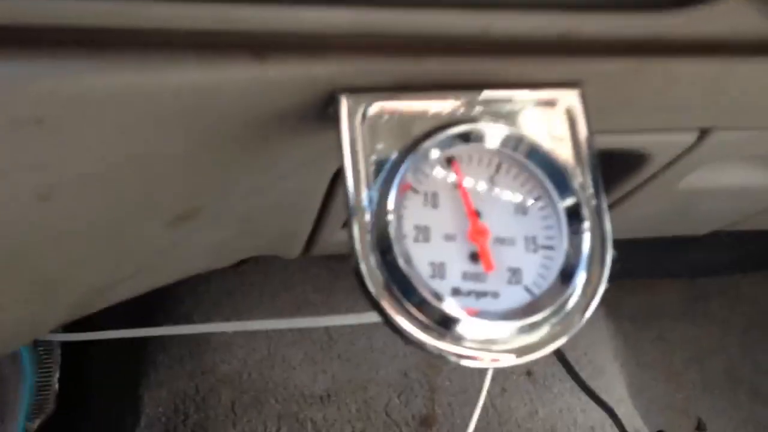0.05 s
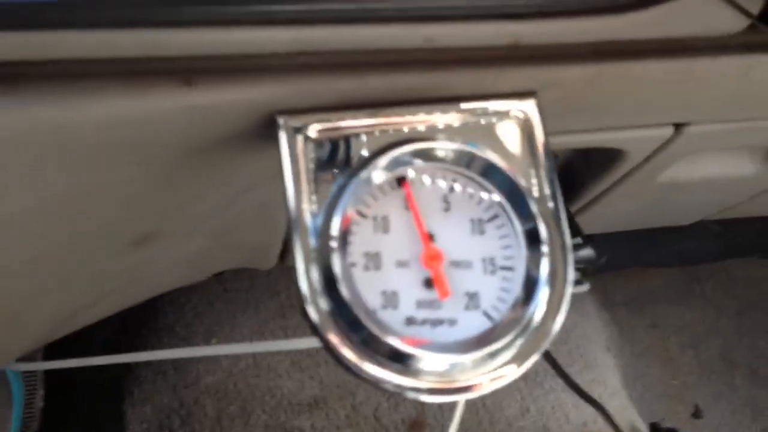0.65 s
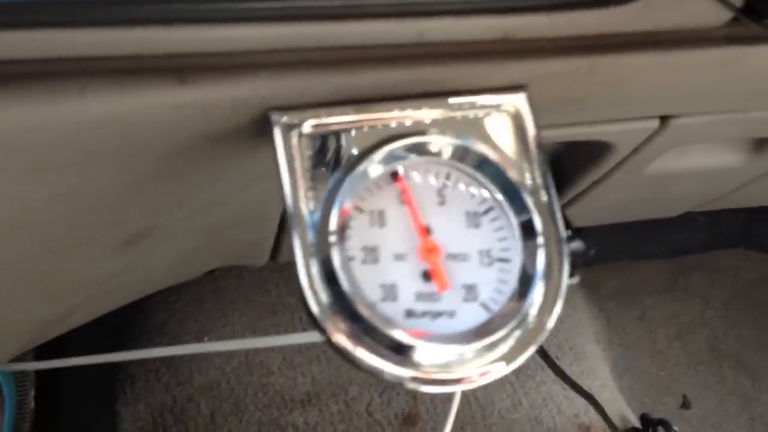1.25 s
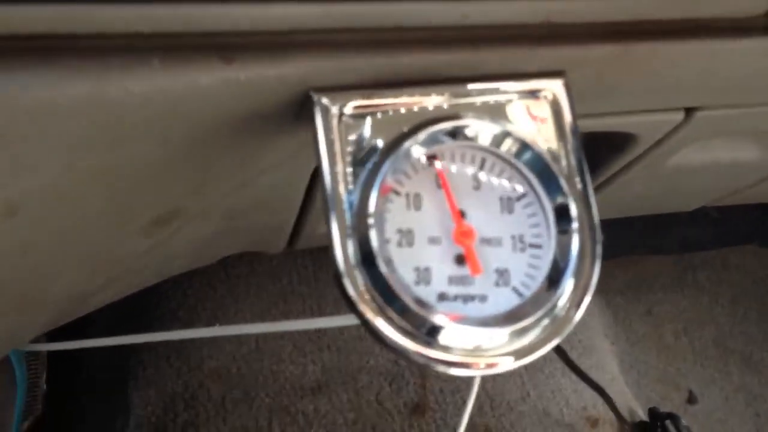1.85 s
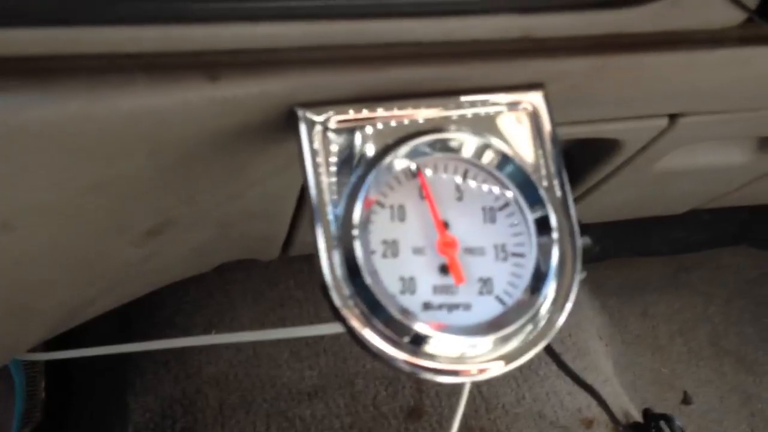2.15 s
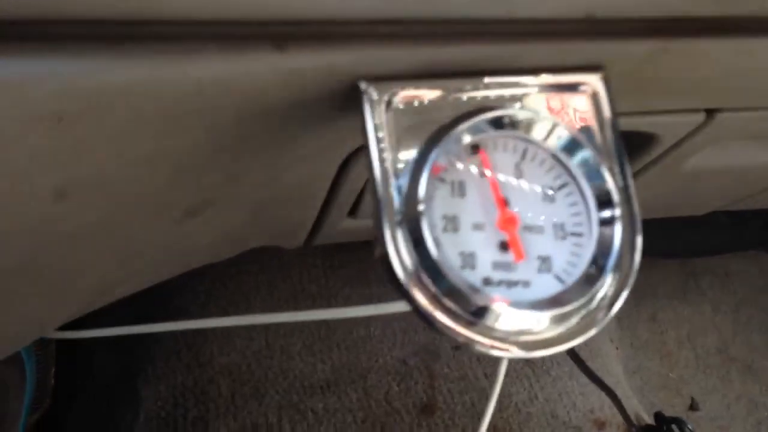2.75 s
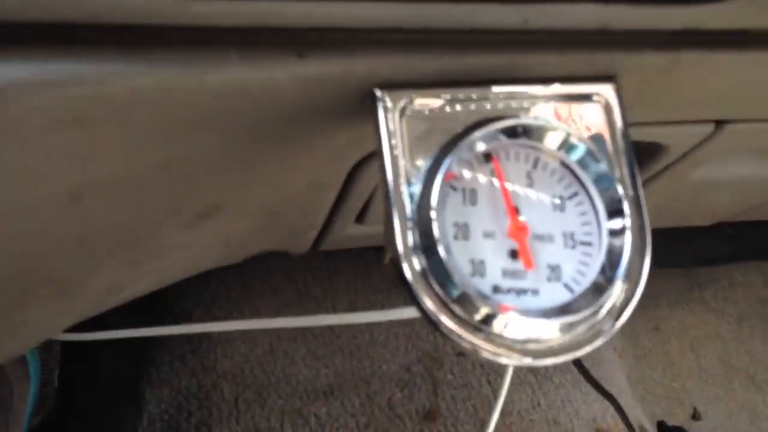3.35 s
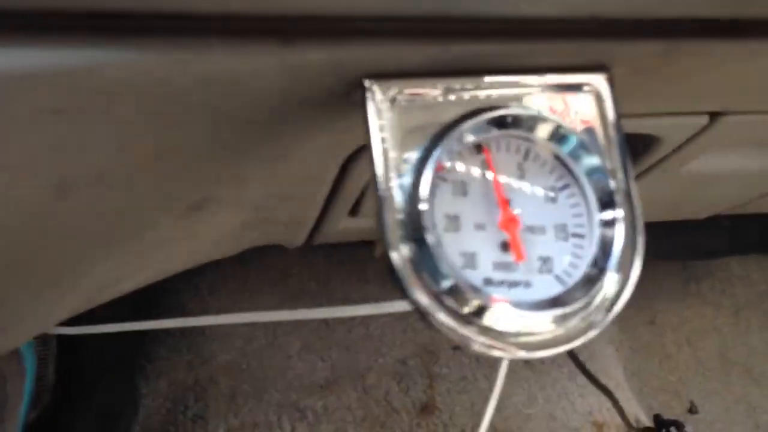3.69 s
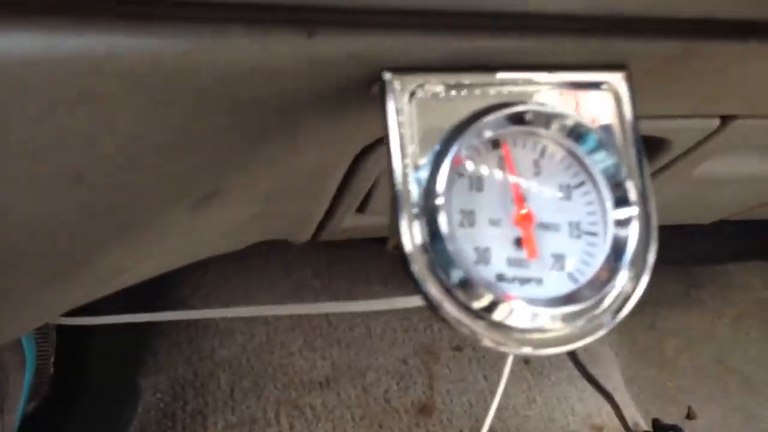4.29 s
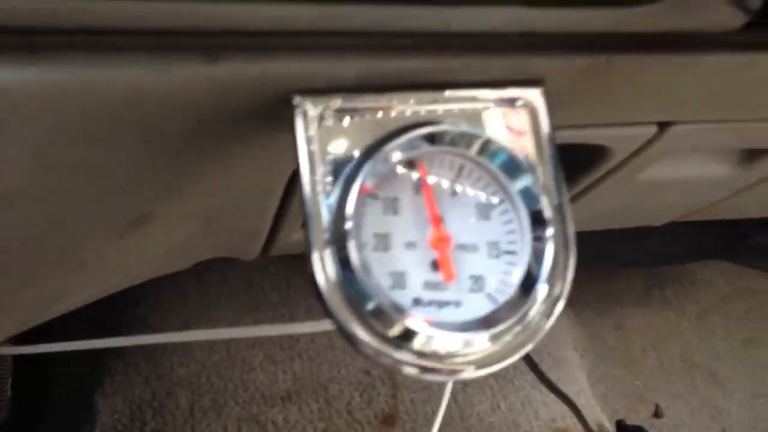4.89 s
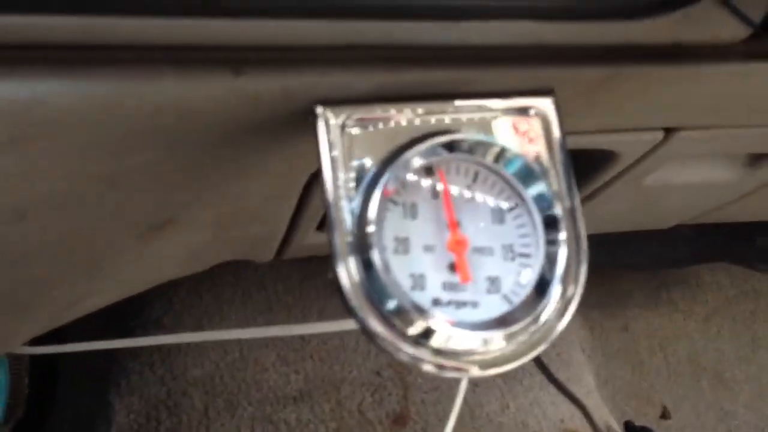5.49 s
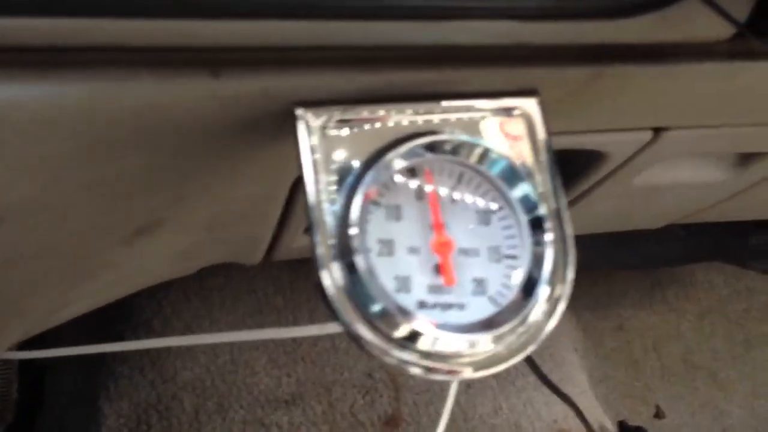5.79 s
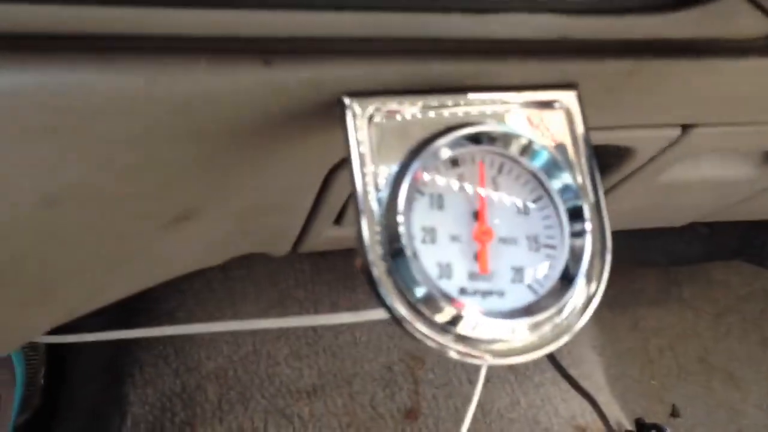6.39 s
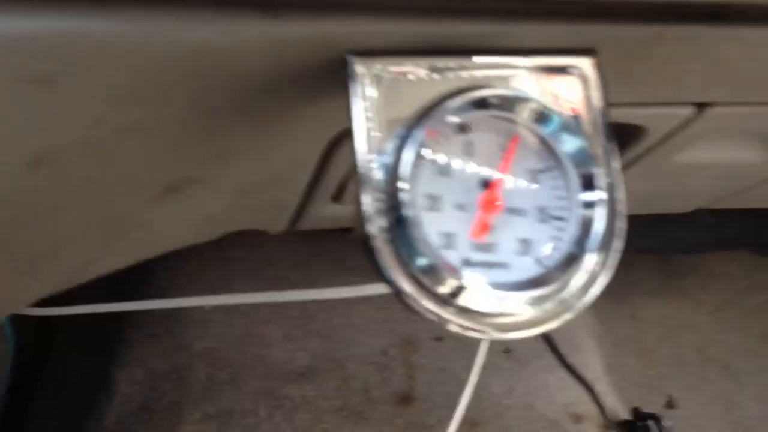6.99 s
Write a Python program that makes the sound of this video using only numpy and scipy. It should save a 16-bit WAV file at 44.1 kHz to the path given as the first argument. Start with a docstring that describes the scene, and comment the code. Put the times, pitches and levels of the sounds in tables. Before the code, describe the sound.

A turbo diesel truck accelerates from a ragged idle, heard from the cab, with booming exhaust, rattling trim and a climbing turbo whistle.

```python
"""Inside a truck's cab, one microphone, a turbo diesel V8 just beyond the bulkhead.
At first it idles: a ragged exhaust, injection clatter through the panels, a hand rustling close by.
From 0.65 s the pedal goes down: the uneven exhaust burbles, the bulkhead growls under load, and the
firing harmonics boom as they sweep through the cab's resonances. Loose trim buzzes and knocks.
Two more pushes, at 5.2 s and 6.9 s, take the revs higher, and the turbo's hiss and whistle climb on."""
import sys
import numpy as np
from scipy.fft import rfft, irfft, dct, next_fast_len
from scipy.io import wavfile
from scipy.ndimage import uniform_filter1d, map_coordinates

SR = 44100
rng = np.random.default_rng(int(sys.argv[2]) if len(sys.argv) > 2 else 0)


def int16_out(signal):
    """Quantize to a 16-bit WAV file."""
    q = np.round(np.clip(np.atleast_2d(signal).T, -1, 1) * 32767)
    wavfile.write(sys.argv[1], SR, q.astype(np.int16))


N = 314874

# resonances of the cab's panels: f/Hz, width/Hz, level/dB
PANEL_MODES = [(596, 12, -3.5), (884, 36, 0.5), (942, 15, -0.5), (993, 22, 1.5), (1323, 15, 1),
               (1654, 14, -6.5), (1960, 16, -8), (2192, 27, -1.5), (2270, 22, -6), (2630, 22, -7),
               (2816, 40, -10), (3110, 21, -10)]
# resonances of the intake duct: f/Hz, width/Hz, level/dB
DUCT_MODES = [(3810, 57, 10.5), (3990, 44, 7), (5090, 110, 2.5)]


def amp(db):
    """Decibels to gain."""
    return 10 ** (np.asarray(db) / 20)


def unit(x):
    """Scale to rms 1."""
    return x / np.sqrt(np.mean(x ** 2) + 1e-20)


def along(points, hz):
    """Gain of (f/Hz, level/dB) points, read on a log axis."""
    f, db = np.transpose(points)
    return amp(np.interp(np.log(hz + 1), np.log(f + 1), db))


def response(spectrum, peaks, hz):
    """Gain of a smooth spectrum with resonances on top."""
    power = along(spectrum, hz) ** 2
    for centre, width, db in peaks:
        power = power + amp(db) ** 2 / (1 + ((hz - centre) / width) ** 2) ** 2
    return np.sqrt(power)


def coloured(x, spectrum, peaks=()):
    """x through a smooth spectrum with resonances on top, at rms 1."""
    size = next_fast_len(N + 8192)
    gain = response(spectrum, peaks, np.fft.rfftfreq(size, 1 / SR))
    return unit(irfft(rfft(x, size) * gain, size)[:N])


def curve(points):
    """One value a sample from (t/s, value) points."""
    return np.interp(np.arange(N) / SR, *np.transpose(points))


def swell(centre_s, half_s):
    """A bell-shaped envelope of height 1."""
    return np.exp(-.5 * ((np.arange(N) / SR - centre_s) / half_s) ** 2)


def strike(start_s, db, t60):
    """An envelope that jumps to db and falls 60 dB every t60 seconds."""
    age = np.arange(N) / SR - start_s
    return (age >= 0) * amp(db - 60 * np.abs(age) / t60)


def noise():
    """Fresh white noise."""
    return rng.standard_normal(N)


def wobble(rate):
    """A smooth random curve, rate knots a second."""
    steps = np.arange(0, N + 64, 64)
    knots = rng.standard_normal(int(N * rate / SR) + 4)
    return np.interp(np.arange(N), steps, map_coordinates(knots, [steps * rate / SR]))


def tone(cycles, drift):
    """A sine of rms 1 whose phase wanders by about drift radians."""
    return np.sqrt(2) * np.sin(2 * np.pi * (cycles + rng.random()) + drift * wobble(5))


def puffs(cycles, decay, scatter_db, cylinder_db):
    """A burst at each firing; every cylinder has its own strength, and no two bursts are alike."""
    firing = 8 * cycles
    index = firing.astype(int)
    cylinders = np.resize(rng.standard_normal(size=8), index.max() + 1)
    strength = amp(cylinder_db * cylinders + scatter_db * rng.standard_normal(len(cylinders)))
    return unit(strength[index] * np.exp(-(firing % 1) / decay))


def hand(click_s=1.781, click_db=-43.5, grain_db=3.5):
    """Close to the microphone: a hand's grainy rustles, some with a dull scrape, and one plastic click."""
    # rustles: t/s, half length/s, hiss level/dB, scrape level/dB
    rustles = [(0.03, 0.013, -58, -50), (0.154, 0.029, -56.8, -55), (0.27, 0.014, -68, -57),
               (0.822, 0.032, -58, -65), (4.0, .018, -58.5, -57), (4.724, 0.0077, -61, -58),
               (7.078, .004, -54, -58)]
    # spectra of the skin's hiss, the scrape and the click: f/Hz, level/dB
    skin_spectrum = [(800, -16), (2000, 0), (3500, 5), (5300, 4.5), (7000, 5.5), (8500, -2), (10000, -4),
                     (15000, -11)]
    scrape_spectrum = [(100, -25), (400, 4), (1100, 1.5), (2500, -11), (6000, -36), (15000, -70)]
    click_spectrum = [(1500, 4.5), (3000, -2), (3800, 2), (4800, -4), (8000, -3.5), (15000, -15.5)]
    hiss = coloured(noise() * amp(grain_db * wobble(400)), skin_spectrum)
    scrape = coloured(noise(), scrape_spectrum)
    rustle = sum(swell(s, half) * (amp(hiss_db) * hiss + amp(scrape_db) * scrape)
                 for s, half, hiss_db, scrape_db in rustles)
    return rustle + strike(click_s, click_db, t60=.04) * coloured(noise(), click_spectrum)


def knocks():
    """Now and then something loose in the dash knocks and rings the panels."""
    # knocks: t/s, level/dB
    blows = [(2.45, -50), (4.226, -47), (5.15, -48), (6.11, -46), (6.914, -44), (6.972, -38)]
    # spectrum of a knock: f/Hz, level/dB
    spectrum = [(400, -10), (900, 0), (1400, 0), (2400, -1), (3300, -9), (5000, -22), (9000, -36),
                (15000, -50)]
    envelope = sum(strike(s, db, t60=.06) for s, db in blows)
    return envelope * coloured(noise(), spectrum, PANEL_MODES)


def chatter():
    """A thin panel chatters briefly on one resonance."""
    # fits of chatter: t/s, half length/s, level/dB
    fits = [(3.49, .02, -60), (3.545, .012, -58), (6.553, .008, -52), (6.697, .008, -52), (6.83, .008, -53),
            (6.975, .012, -49)]
    # the panel's resonance: f/Hz, width/Hz, level/dB
    mode = [(2200, 60, -6)]
    envelope = sum(amp(db) * swell(s, half) for s, half, db in fits)
    return envelope * coloured(noise(), [(2200, -70)], mode)


def trim():
    """A loose trim piece buzzes on one narrow resonance."""
    # course of the buzz: t/s, level/dB
    levels = [(0, -71.5), (1.3, -66), (2.4, -62.5), (4, -68), (7.1, -60.5)]
    # the piece's resonance: f/Hz, width/Hz, level/dB
    mode = [(1205, 17.6, -6)]
    return amp(curve(levels)) * coloured(noise(), [(1200, -82)], mode)


def shudder(revs, boost, jolt_db, idle_db=-71.5, octave_db=4.8, boost_db=14, climb_db=6.5, lumps_db=3):
    """The floor shudders in lumps, harder with speed and boost and while the engine speed climbs."""
    # spectrum of the floor: f/Hz, level/dB
    spectrum = [(10, -24), (22, -11.5), (40, -4.5), (58, 1.5), (78, -5), (130, -42), (400, -120)]
    octaves_per_s = np.gradient(uniform_filter1d(revs, size=SR // 4)) * SR
    climbing = np.clip(octaves_per_s / .19, 0, 1)
    level_db = idle_db + octave_db * revs + boost_db * boost + climb_db * climbing + jolt_db
    return amp(level_db) * coloured(noise() * amp(lumps_db * wobble(20)), spectrum)


def intake(revs, boost, whistle_hz, base_db=-76, octave_db=12, boost_db=3.2,
           spooled_hz=3600, unspooled_db=-9):
    """Air rushes through the intake duct, rising with speed and boost and as the turbo spools up."""
    # spectrum of the rush: f/Hz, level/dB
    spectrum = [(1000, -30), (2500, 6.5), (4000, -0.5), (5500, -3), (7000, -6.5), (9000, -13.5),
                (12000, -16.5), (15000, -22)]
    spool_db = np.interp(whistle_hz, [whistle_hz.min(), spooled_hz], [unspooled_db, 0])
    level_db = base_db + octave_db * revs + boost_db * boost + spool_db
    return amp(level_db) * coloured(noise(), spectrum, DUCT_MODES)


def turbo(whistle_hz, revs, boost, idle_db=-97.5, octave_db=18, boost_db=2.3,
          ring_db=-86.5, ring_octave_db=8.5):
    """The compressor's breathy whistle grows with speed and boost and rings the duct's resonances."""
    # slow noise widens the whistle into a band
    flutter = coloured(noise(), [(10, 0), (150, 0), (400, -9), (1100, -28), (4000, -90)])
    whistle = flutter * tone(np.cumsum(whistle_hz) / SR, drift=0)
    ring = coloured(whistle, [(1000, -40)], DUCT_MODES)
    whistle_db = idle_db + octave_db * revs + boost_db * boost
    return amp(whistle_db) * whistle + amp(ring_db + ring_octave_db * revs) * ring


def snarl(cycles, revs, load, base_db=-61.5, octave_db=8, off_load_db=-12):
    """Under load the block repeats one vibration every cycle: a pitched snarl of dense high harmonics."""
    # the block as heard in the cab: f/Hz, level/dB
    spectrum = [(250, -40), (420, 6), (540, 4), (700, -2), (1100, -1), (1600, -6), (3000, -22), (6000, -60)]
    one_cycle = rng.standard_normal(size=256)
    vibration = map_coordinates(one_cycle, [cycles % 1 * len(one_cycle)], order=1, mode="grid-wrap")
    level_db = base_db + octave_db * revs + off_load_db * (1 - load)
    return amp(level_db) * coloured(vibration, spectrum, PANEL_MODES)


def clatter(cycles, revs, boost, idle_db=-58.4, octave_db=7.9, boost_db=1.7, surge_db=.65, smear=2.8):
    """Each injection knocks, louder with speed and boost; bulkhead and panels smear it into clatter."""
    # the injections as heard in the cab: f/Hz, level/dB
    spectrum = [(150, -42), (470, -6), (600, 5), (760, -2), (1050, -5.5), (1400, -4), (1900, -7.5),
                (2900, -12.5), (3400, -18.5), (5000, -24), (9000, -41), (15000, -67)]
    injections = smear + puffs(cycles, decay=.65, scatter_db=3.3, cylinder_db=1.8)
    level_db = idle_db + octave_db * revs + boost_db * boost + surge_db * wobble(12)
    return amp(level_db) * coloured(noise() * injections, spectrum, PANEL_MODES)


def growl(cycles, revs, load, base_db=-53.2, octave_db=4.8, slack_db=-20, settled_load=.3):
    """Once the engine pulls, its firings set the bulkhead growling in the low middle."""
    # the bulkhead's response: f/Hz, level/dB
    spectrum = [(150, -50), (260, -12), (300, -10), (350, -1), (385, -1.5), (410, -6), (460, 0), (490, -3),
                (540, -18), (1200, -70)]
    slack = np.clip(1 - load / settled_load, 0, 1)
    firings = noise() * puffs(cycles, decay=.6, scatter_db=1.5, cylinder_db=1.5)
    return amp(base_db + octave_db * revs + slack_db * slack) * coloured(firings, spectrum)


def rumble(cycles, revs, boost, slack, base_db=-46.8, octave_db=4.8, boost_db=5.8, slack_db=3.3):
    """Unequal firings leave the exhaust as a ragged rumble that grows with speed and boost."""
    # the rumble as heard in the cab: f/Hz, level/dB
    spectrum = [(45, -30), (78, -11), (105, -18), (124, -2), (140, 2), (168, -2), (205, -2), (238, 2),
                (264, -4), (290, -1.5), (335, -11), (370, -12), (405, -16), (460, -10), (540, -22),
                (1500, -100)]
    firings = noise() * puffs(cycles, decay=.7, scatter_db=1.2, cylinder_db=1)
    level_db = base_db + octave_db * revs + boost_db * boost + slack_db * slack
    return amp(level_db) * coloured(firings, spectrum)


def burble(cycle_hz, cycles, revs, load, slack, base_db=-51.5, octave_db=7.4,
           loaded_db=3.6, slack_db=-13, waver_db=1.6):
    """The unevenly firing banks make weaker harmonics that beat together; their mix shifts with load."""
    # harmonics: multiple of the engine cycle, light-load level/dB, heavy-load level/dB
    harmonics = [(6.0, -1.1, -8.2), (7.0, 0.1, -4.0), (9.0, 1.5, 0.5), (11.0, 6.9, -3.1),
                 (12.0, -7.8, -0.3), (13.0, 3.6, 2.1), (14.0, -3.8, 1.0), (15.0, -1.4, 2.9),
                 (17.0, -1.9, 1.8), (18.0, 0.9, 1.9), (19.0, 4.2, 0.8), (20.0, 0.7, 2.6), (21.0, 0.8, 4.5),
                 (22.0, -1.1, 5.3), (23.0, 0.8, -2.1), (25.0, 0.7, 3.6), (26.0, 5.6, 4.6),
                 (27.0, -0.1, 2.3), (28.0, -0.6, -1.4), (29.0, 0.6, 1.0), (30.0, 1.5, 4.1),
                 (31.0, -1.9, -1.7), (32.0, 3.7, 0.5), (33.0, 0.2, -2.6), (34.0, 1.3, -0.8),
                 (35.0, -2.7, 2.6), (36.0, 1.1, -5.8), (37.0, -3.5, -1.5), (38.0, -4.0, -3.9),
                 (39.0, -7.0, -4.0), (40.0, 2.4, -2.7)]
    # the exhaust's path into the cab: f/Hz, level/dB
    path = [(45.0, -31.0), (62.0, -24.3), (80.0, -13.6), (92.0, -14.3), (105.0, -24.5), (122.0, -6.5),
            (142.0, 0.0), (160.0, -2.8), (180.0, -1.3), (205.0, -3.7), (240.0, -9.4), (265.0, -15.6),
            (290.0, -6.5), (335.0, -18.1), (370.0, -16.2), (405.0, -22.0), (460.0, -19.0), (540.0, -24.3),
            (750.0, -23.8)]
    heavy = np.clip((load - .45) / .4, 0, 1)
    wave = np.zeros(N)
    for order, light_db, heavy_db in harmonics:
        level_db = light_db + (heavy_db - light_db) * heavy + waver_db * wobble(3)
        wave += amp(level_db) * along(path, order * cycle_hz) * tone(order * cycles, drift=.15)
    return amp(base_db + octave_db * revs + loaded_db * heavy + slack_db * slack) * wave


def exhaust(cycle_hz, cycles, revs, load, boost, settled_load=.26):
    """At idle the exhaust is a ragged rumble; under load a regular burble takes over."""
    slack = np.clip(1 - load / settled_load, 0, 1)
    return rumble(cycles, revs, boost, slack) + burble(cycle_hz, cycles, revs, load, slack)


def boom(firing_hz, cycles, load, waver_db=1.3, fade_octave_db=80):
    """Strong harmonics boom, each in its range of speed, and swell on the cab's resonances;
    the lower four grow with load, the highest recedes."""
    # harmonics: multiple of the engine cycle, full-load level/dB, change off load/dB,
    # firing rate when fully grown/Hz, growth up to there/(dB an octave), firing rate where it fades/Hz
    harmonics = [(5, -32, -9, 127, 35, 150), (8, -22.5, -20, 133, 38, 152), (10, -25, -19, 109, 37, 124),
                 (16, -26, -10.5, 87, 44, 150), (24, -44, 14, 63.5, 75, 78.5)]
    # the cab's resonances: f/Hz, width/Hz, level/dB
    cab_modes = [(84.5, 12.3, -2), (144.5, 14, -1.5), (170, 10.6, -3.5), (202, 13, 1.8), (223, 13, -1),
                 (250.4, 14, -6.5), (297.4, 10.7, -1.5)]
    # the cab's response between them: f/Hz, level/dB
    cab_spectrum = [(40, -21), (75, -22), (108, -30), (180, -19.5), (272, -17), (340, -10), (480, -12)]
    wave = np.zeros(N)
    for order, db, off_load_db, grown_hz, octave_db, fade_hz in harmonics:
        level_db = db + off_load_db * (1 - load)
        level_db += octave_db * np.minimum(np.log2(firing_hz / grown_hz), 0)
        level_db -= fade_octave_db * np.maximum(np.log2(firing_hz / fade_hz), 0)
        cab = response(cab_spectrum, cab_modes, order * firing_hz / 8)
        wave += amp(level_db + waver_db * wobble(22)) * cab * tone(order * cycles, drift=.12)
    return wave


def throb(cycles, boost, throb_db=.7, bank_db=4, rough_db=1.8):
    """The engine's gain swells once a cycle; under boost the banks thump in turn and it roughens."""
    cycle_swing = throb_db * np.sin(2 * np.pi * cycles)
    bank_swing = np.minimum(boost, .5) * bank_db * np.sin(2 * np.pi * 2 * cycles)
    return amp(cycle_swing + bank_swing + rough_db * boost * wobble(70))


def chugs():
    """The engine chugs as it takes up load and jolts the floor: level changes of both, in dB."""
    # chugs: t/s, half length/s, exhaust change/dB, shudder change/dB
    jolts = [(1.469, .016, 4, 3), (1.613, 0.017, 3.5, 4), (2.5, 0.035, 0.5, 8), (3.01, .035, 2, 5),
             (4.02, .025, 0, 7), (5.34, .06, 4, 7), (5.94, 0.071, 2.5, 9), (6.99, .04, 2, 5),
             (7.1, .05, 4, -3)]
    return sum(np.outer([exhaust_db, floor_db], swell(s, half))
               for s, half, exhaust_db, floor_db in jolts)


def pedal():
    """Each push adds load and steps up the level of clatter, snarl and intake."""
    # pushes: t/s, rise/s, added load/0-1, level step/dB
    pushes = [(0.65, .95, 0.42, 0), (5.22, .08, .48, .5), (6.86, 0.06, 0.11, 1.9)]
    t = np.arange(N) / SR
    load, step_db = np.zeros(N), np.zeros(N)
    for start, rise, added, db in pushes:
        pressed = np.clip((t - start) / rise, 0, 1)
        load += added * pressed
        step_db += db * pressed
    return load, step_db


def scene(idle_firing_hz=44.8, boost_from_hz=4200, wander_cycles=.0035):
    """The cab at the microphone: speed, pedal and turbo drive the engine, with small noises close by."""
    # engine speed: t/s, firing rate/Hz
    engine_speed = [(0.0, 43.8), (0.8, 45.0), (1.2, 49.1), (1.7, 57.8), (2.1, 63.5), (2.5, 67.2),
                    (3.1, 75.3), (3.5, 78.9), (4.1, 81.9), (4.6, 83.7), (5.05, 85.4), (5.19, 90.0),
                    (5.3, 98.3), (5.45, 104.5), (5.7, 108.5), (6.0, 112.8), (6.3, 121.2), (6.55, 125.8),
                    (6.82, 129.0), (6.97, 142.2), (7.14, 152.2)]
    # turbo speed: t/s, whistle f/Hz
    turbo_speed = [(0, 2470), (1.4, 2685), (2.3, 3330), (2.62, 3990), (2.95, 4430), (5.2, 4501), (6, 4800),
                   (6.4, 5200), (6.72, 5919), (6.97, 7000), (7.14, 7960)]
    firing_hz, whistle_hz = curve(engine_speed), curve(turbo_speed)
    load, step_db = pedal()
    chug_db, jolt_db = chugs()
    cycle_hz = firing_hz / 8  # eight firings make a cycle
    # the crankshaft runs slightly ahead and behind, which blurs the high harmonics
    cycles = np.cumsum(cycle_hz) / SR + wander_cycles * wobble(14)
    revs = np.log2(firing_hz / idle_firing_hz)  # octaves above idle
    boost = np.maximum(np.log2(whistle_hz / boost_from_hz), 0)  # octaves of turbo speed
    body = boom(firing_hz, cycles, load) + growl(cycles, revs, load)
    body += amp(chug_db) * exhaust(cycle_hz, cycles, revs, load, boost)
    engine = throb(cycles, boost) * body
    engine += amp(step_db) * (clatter(cycles, revs, boost) + snarl(cycles, revs, load))
    air = amp(step_db) * intake(revs, boost, whistle_hz) + turbo(whistle_hz, revs, boost)
    cab = shudder(revs, boost, jolt_db) + trim() + chatter() + knocks()
    return (engine + air + cab + hand())[None]


def record(dry, hiss_db=-64.5, top_hz=15330):
    """The microphone adds its hiss; nothing passes above the band limit."""
    # microphone hiss: f/Hz, level/dB
    spectrum = [(100, -2), (2000, 3.5), (6000, 3), (10000, -1), (15000, -3.5)]
    sound = dry + amp(hiss_db) * coloured(noise(), spectrum)
    passed = np.arange(N) * SR / (2 * N) < top_hz
    return dct(dct(sound, norm="ortho") * passed, type=3, norm="ortho")


dry = scene()
out = record(dry)
int16_out(out)
```